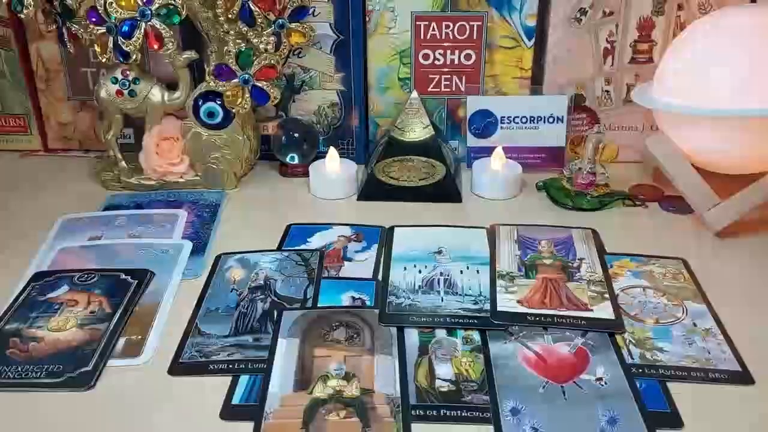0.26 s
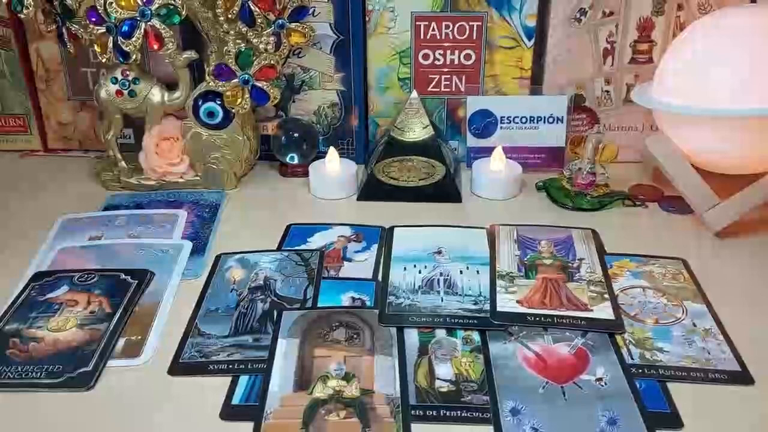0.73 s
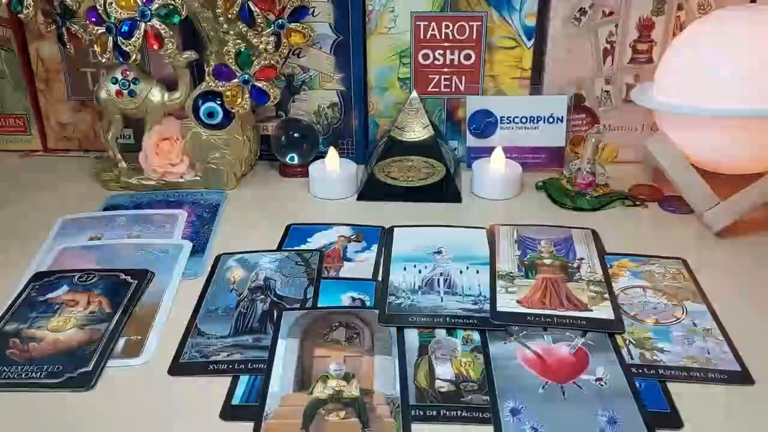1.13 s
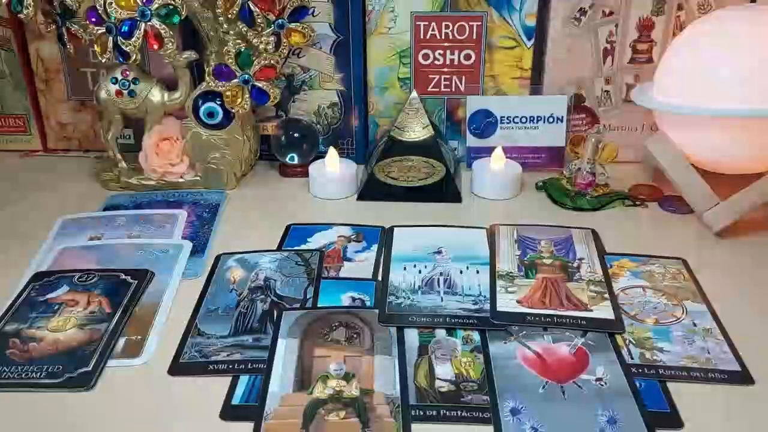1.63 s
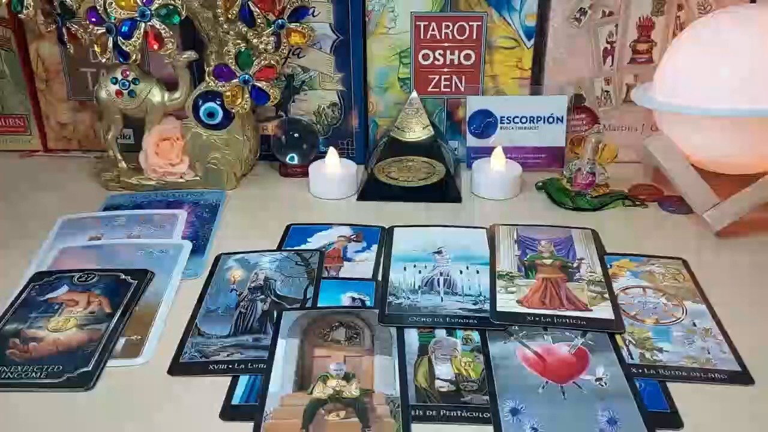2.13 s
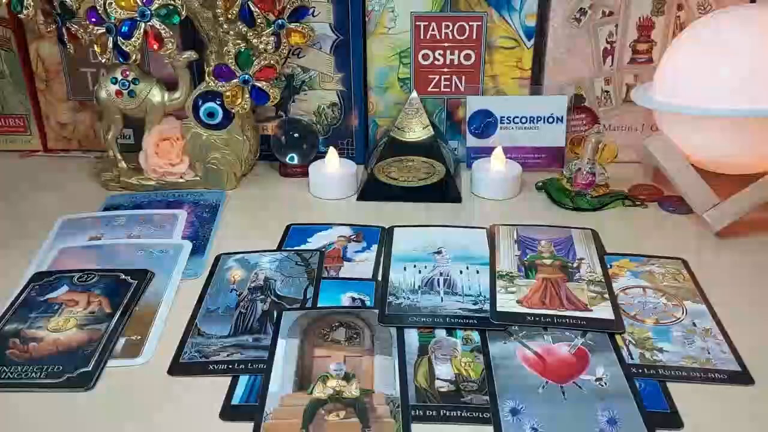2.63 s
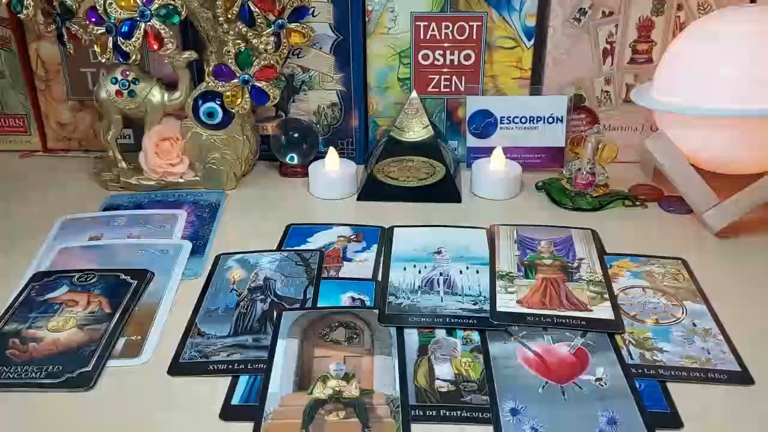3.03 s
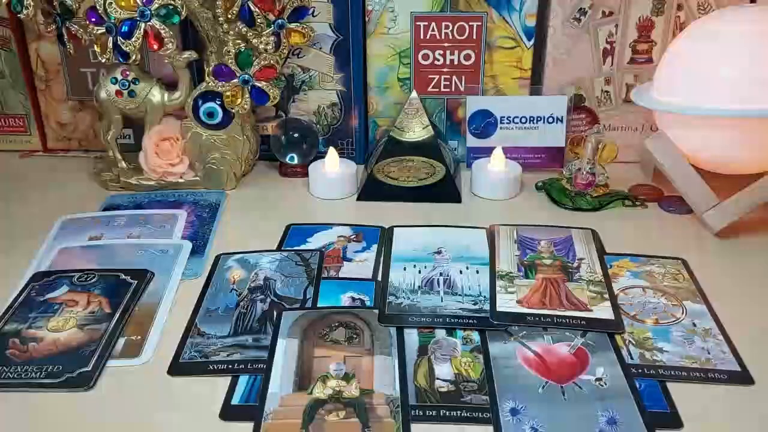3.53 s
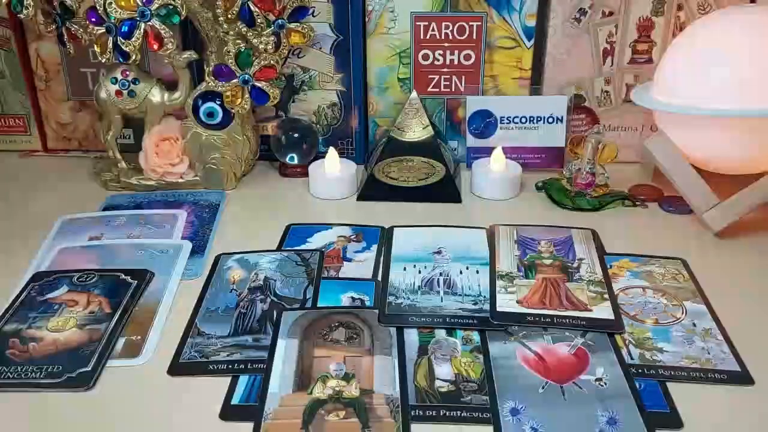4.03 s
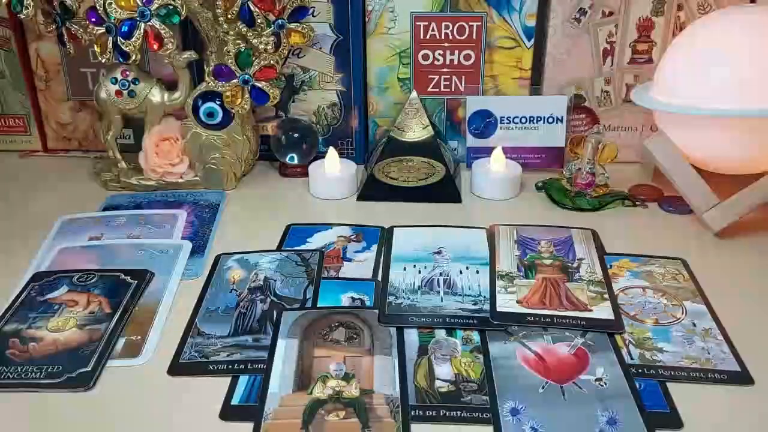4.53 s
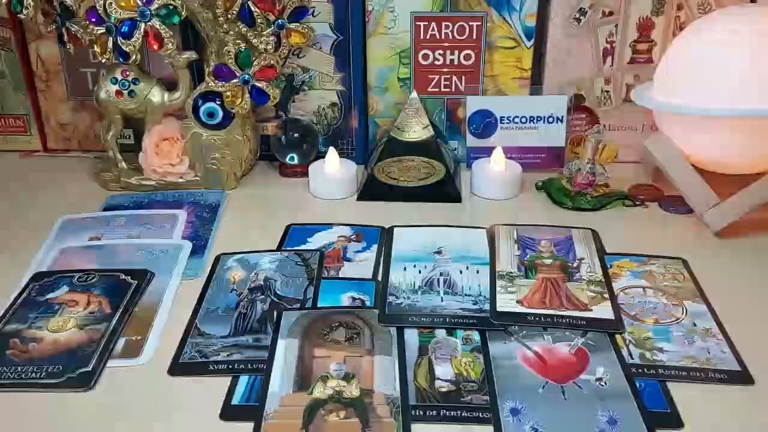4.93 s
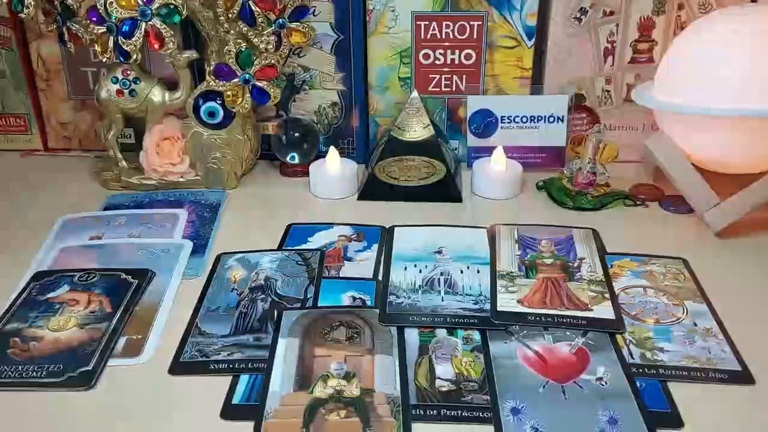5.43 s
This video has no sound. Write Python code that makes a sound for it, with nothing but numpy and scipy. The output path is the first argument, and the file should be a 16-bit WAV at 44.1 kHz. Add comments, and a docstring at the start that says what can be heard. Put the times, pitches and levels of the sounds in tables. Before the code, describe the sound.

Close card shuffling at a table, with dry flicks, papery rustles, dull knocks and soft low thumps over faint room hum.

```python
"""Card shuffling over a table

A deck of cards is handled close by in a small room: it knocks on the table, edges snap, faces slide, skin brushes.
Clicks with dying scuffs make knocks and snaps; grains and noise make slides; shaped noise makes brushes.
A stereo-widening effect smears the cards into a short wide splash, and a room tail follows.
Hand bumps ring the table modes; a stand sways, the table booms, a low hum wavers and a hiss lies beneath."""
import sys
import numpy as np
from scipy import signal
from scipy.fft import rfft, irfft
from scipy.io import wavfile
from scipy.ndimage import uniform_filter1d

SR = 44100
rng = np.random.default_rng(int(sys.argv[2]) if len(sys.argv) > 2 else 0)


def waveform_to_disk(signal):
    """Save audio, clipped to [-1, 1], as 16-bit WAV at the path in sys.argv[1]."""
    frames = np.transpose(np.atleast_2d(signal))
    scaled = np.clip(frames, -1, 1) * 32767
    samples = np.round(scaled).astype(np.int16)
    wavfile.write(sys.argv[1], SR, samples)


N = 250468
TIME = np.arange(N) / SR


def amp(db):
    """Decibels to gain."""
    return 10 ** (np.asarray(db) / 20)


def evened(x):
    """Scales to an rms of one."""
    return x / np.sqrt(np.mean(x ** 2) + 1e-20)


def read(points, hz):
    """Reads a table on a log-frequency axis."""
    f, value = np.transpose(points)
    return np.interp(np.log(hz + 1), np.log(f + 1), value)


def coloured(x, points):
    """Filters by a table of (frequency [Hz], gain [dB])."""
    size = x.shape[-1]
    gain = amp(read(points, np.fft.rfftfreq(size, 1 / SR)))
    return irfft(rfft(x) * gain, size)


def add(mix, s, sound):
    """Mixes a sound in, centred on time s."""
    start = round(s * SR) - len(sound) // 2
    part = mix[max(start, 0):start + len(sound)]
    part += sound[max(-start, 0):][:len(part)]


def peaks(modes, hz):
    """The dB curve of a set of (centre [Hz], width [Hz], lift [dB]) resonances."""
    return sum(db / (1 + (2 * (hz - f) / width) ** 2) for f, width, db in modes)


def ring(x, modes, size=8192):
    """Minimum-phase resonances, which ring on after the sound that drives them."""
    log_gain = np.log(amp(peaks(modes, abs(np.fft.fftfreq(size, 1 / SR)))))
    spectrum = np.exp(np.conj(signal.hilbert(log_gain)))
    response = np.fft.ifft(spectrum).real
    return signal.fftconvolve(x, response[:size // 2])[:len(x)]


def contact(scuff, drag_s, size=8192):
    """One click in the middle, followed by a scuff that dies exponentially."""
    t = (np.arange(size) - size // 2) / SR
    drag = rng.standard_normal(size) * np.exp(-abs(t) / max(drag_s, .001)) * (t > 0)
    return ((t == 0) + scuff * drag / np.linalg.norm(drag)) / np.hypot(1, scuff)


# deck on table: (time [s], relative level [dB], bass weight [dB], contact time [ms], hollow under the hand [Hz])
KNOCK_EVENTS = [(.713, -21.5, -3.5, 0.44, 1060), (.743, -17.5, -13, 0.37, 810),
                (.817, -23.5, -7.5, 1.1, 690), (.91, -31, -9, 0.64, 694), (.982, -15, -12.5, 1.23, 348),
                (1.009, -22, -24, 1.26, 322), (1.735, -36.5, 2.5, 1.1, 330), (1.762, -37.5, -6, 1, 338),
                (2.802, -13, -5, 0.29, 890), (3.022, -25.5, -6, 0.88, 480), (3.229, -17, -9, 0.35, 1350),
                (3.298, -13, -7.5, 0.15, 1830), (4.25, -24.5, -2.5, 0.31, 1210),
                (4.287, -32, 9.5, 0.13, 810), (4.327, -11, -29, 0.17, 2500), (5.223, -23.5, -15, 0.33, 297)]
# knock spectrum: (frequency [Hz], gain [dB])
KNOCK_SPECTRUM = [(60, 27), (180, 24), (320, 23.5), (550, 13.5), (800, 16.5), (1200, 15.5), (2000, 13),
                  (3200, 8), (5000, 8.5), (7000, 4), (10000, 3.5), (14500, -6)]
THUD_DB, SCUFF_DB = -9.5, -30  # thud relative to the bass weight; floor under the contact's treble loss
HOLLOW_Q, HOLLOW_DB_PER_MS = 4, 10.5  # a slower blow traps more air, so its hollow rings more
CRACK_DB, CRACK_CONTACT_MS = 12.5, 0.11  # treble lift at zero contact time; contact time that cuts it to 1/e


def knocks(lag_s=.011, overtone=2.33, overtone_share=0.56, steepness=1.89):
    """The deck lands: longer contact makes a duller blow; air under the hand adds two resonances."""
    out, bands_hz = np.zeros(N), np.geomspace(60, 15000, 25)
    for s, db, bass_db, contact_ms, hz in KNOCK_EVENTS:
        crack_db = CRACK_DB * np.exp(-contact_ms / CRACK_CONTACT_MS)
        weight = [(180, bass_db + THUD_DB), (350, bass_db), (700, 0.006), (1100, 0),
                  (1900, crack_db), (5500, crack_db), (10000, 0.0045)]
        corner_hz = 1000 / contact_ms
        lowpass_power = 1 / (1 + (bands_hz / corner_hz) ** (2 * steepness))
        softness_db = 10 * np.log10(lowpass_power + amp(SCUFF_DB) ** 2)
        hardness = np.transpose([bands_hz, read(weight, bands_hz) + softness_db])
        click = coloured(contact(scuff=1.0, drag_s=0.015), KNOCK_SPECTRUM)
        blow = coloured(click, hardness)
        lift_db, width_hz = HOLLOW_DB_PER_MS * contact_ms, hz / HOLLOW_Q
        hollow = [(hz, width_hz, lift_db), (hz * overtone, width_hz, lift_db * overtone_share)]
        add(out, s + lag_s, amp(db) * ring(blow, hollow))  # the lag offsets the lead of the smear
    return out


# edges off the pack: (time [s], relative level [dB], hollow body [dB], sharp edge [dB], drag decay [s])
SNAP_EVENTS = [(0.15, -16, -6.5, -2, 0.021), (0.258, -1.5, -19, -13.5, 0.012), (0.321, -12, -21, -19, .011),
               (0.439, -10.5, -12.5, -4, 0.018), (1.66, -20, -16.5, -12.5, 0.043),
               (2.027, -3.5, -16.5, -8, .008), (2.543, -16.5, -23, -4.5, .014),
               (2.562, -22, -8, 3.5, 0.0076), (2.676, -14.5, -24.5, -19.5, 0.009),
               (3.687, -13.5, -7, -9.5, 0.015), (4.323, 1, -25, -1.5, 0.027), (4.515, -10, -40, 8, 0.018),
               (4.538, -14.5, -35, 13.5, 0.012), (4.621, -13.5, -26, 12, .009), (4.69, -12, -36, -1, .017),
               (4.738, -11, -28, -13, 0.0081), (4.894, -18, -12.5, -7.5, 0.059),
               (5.305, -5.5, -40, -11, 0.0097), (5.367, -8, -31, -30, 0.0064),
               (5.507, 1, -44, -17.5, 0.0061)]
# snap spectrum: (frequency [Hz], gain [dB])
SNAP_SPECTRUM = [(60, 8), (130, 19.5), (300, 12.5), (520, 9), (800, 6.5), (1300, -1), (2200, 1),
                 (3400, 2.5), (5200, 6.5), (7000, -4.5), (9000, -4), (14500, -14)]


def snaps(lag_s=.010):
    """A bent card edge springs free and drags over the next card."""
    out = np.zeros(N)
    for s, db, body_db, edge_db, drag_s in SNAP_EVENTS:
        hardness = [(350, body_db), (1300, 0), (4000, edge_db)]
        click = coloured(contact(scuff=1.0, drag_s=drag_s), SNAP_SPECTRUM)
        add(out, s + lag_s, amp(db) * coloured(click, hardness))
    return out


def resonate(x, hz, width_hz):
    """A resonance of gain one that follows the curve hz."""
    turn = np.exp(2j * np.pi * np.cumsum(hz) / SR)
    r = np.exp(-np.pi * width_hz / SR)
    return 2 * (turn * signal.lfilter([1 - r], [1, -r], x / turn)).real


def shifting(x, patchy_db):
    """The touching parts of the cards keep changing, so patches of the spectrum come and go."""
    z = signal.stft(x, SR, nperseg=512)[2]
    patches = uniform_filter1d(rng.standard_normal(z.shape), size=6, axis=0)
    patches = evened(uniform_filter1d(patches, size=8, axis=1))
    return signal.istft(z * amp(patchy_db * patches), SR, nperseg=512)[1][:N]


# card strokes, one list each: (time [s], pressure as relative level [dB], brightness [dB])
SLIDE_STROKES = [
    [(0, -27.5, -7), (.014, -29.5, -2.5), (.245, -36, -7), (.27, -29, -2.5), (.356, -40.5, 2.5),
     (.375, -25, -7), (.408, -38.5, -2), (.45, -24, -3.5), (.49, -33.5, -2.5)],
    [(3.76, -51, -6), (3.814, -32.5, -3.5), (3.84, -55, 5)],
    [(4.37, -38, -18), (4.382, -18.5, -3.5), (4.436, -35, 9.5), (4.502, -24.5, 5.5), (4.546, -17.5, 2),
     (4.572, -27.5, 5.5), (4.65, -20.5, 3), (4.76, -24, 10.5), (4.86, -44.5, -9)],
    [(5.12, -41, -16), (5.186, -33.5, -2.5), (5.384, -30, -2), (5.412, -39.5, -2), (5.482, -35, -1.5),
     (5.524, -19.5, -0.5), (5.552, -30, -3.5), (5.616, -28.5, -3), (5.68, -36.5, -1)],
]
# rub spectrum: (frequency [Hz], gain [dB])
SLIDE_SPECTRUM = [(59, -44), (100, -1), (383, -8), (425, -2), (535, -13), (797, -2), (1430, -7.5),
                  (1560, -5), (2370, -11), (3460, -14), (5260, -11.5), (6620, -17.5), (8880, -17),
                  (14100, -25.5), (15000, -78)]
# resonances of the pack: (centre [Hz], width [Hz], lift [dB])
PACK_MODES = [(2500, 820, 9), (5530, 510, 8.5), (8510, 630, 12)]
# scrape pitch under a loose grip, its rise under a firm one, its rms random drift
SCRAPE_HZ, SCRAPE_RISE_HZ, SCRAPE_WANDER_HZ = 2060, 380, 198


def slides(catches_per_s=260, spread_db=5, smooth=0.25, split_hz=3700, firm_db=-25, scrape_db=0,
           touch_s=0.0058):
    """Faces catch and slip in tiny grains over a smooth swish; firm strokes make the pack resonate."""
    size = amp(spread_db * np.minimum(rng.exponential(1, N), 3))
    caught = rng.choice([-1, 1], N) * (rng.random(N) < catches_per_s / SR)
    grains = evened(size * caught)
    rub = coloured(grains + smooth * rng.standard_normal(N), SLIDE_SPECTRUM)
    rub = shifting(rub, patchy_db=3)
    dull = signal.sosfiltfilt(signal.butter(3, split_hz, fs=SR, output="sos"), rub)

    s, db, bright_db = np.concatenate(SLIDE_STROKES).T
    touching = sum(np.clip(np.minimum(TIME - rows[0][0], rows[-1][0] - TIME) / touch_s + 1, 0, 1)
                   for rows in SLIDE_STROKES)
    pressure = touching * amp(np.interp(TIME, s, db))
    firm = pressure ** 2 / (pressure ** 2 + amp(firm_db) ** 2)
    bright = amp(np.interp(TIME, s, bright_db)) * evened(rub - dull)

    drift = uniform_filter1d(rng.standard_normal(N), size=2000)
    drift = evened(uniform_filter1d(drift, size=2000))
    scrape_hz = SCRAPE_HZ + SCRAPE_RISE_HZ * firm + SCRAPE_WANDER_HZ * drift
    dull = evened(dull + amp(scrape_db) * resonate(dull, scrape_hz, width_hz=480))

    swish = pressure * (dull + bright)
    loose = coloured((1 - firm) * swish,
                     [(90, 1.0), (180, 4.5), (320, 8.5), (700, 7.5), (2000, 4), (12000, 3.5)])
    gripped = coloured(firm * swish, [(150, -16), (300, -3), (700, -3), (2000, 4.5), (12000, -4)])
    return loose + ring(gripped, PACK_MODES)


# fingertips on card: (time [s], length [s], relative level [dB])
BRUSH_EVENTS = [(0.66, 0.099, -50), (0.846, 0.059, -44), (1.02, .055, -50.5), (1.198, 0.026, -49.5),
                (1.313, 0.11, -51), (1.562, 0.042, -52), (1.824, 0.071, -47.5), (2.271, 0.085, -52.5),
                (2.486, .085, -46.5), (3.615, .054, -53), (5.013, 0.08, -51.5), (5.089, 0.036, -42.5)]
# brush spectrum: (frequency [Hz], gain [dB])
BRUSH_SPECTRUM = [(300, -8), (1000, 8), (2500, 0), (3600, -4), (5300, 3), (7000, -5.5), (9000, -2.5),
                  (13000, -12), (15000, -12)]


def brushes():
    """Skin passes lightly over card: a soft, even hiss that swells and fades."""
    level = sum(amp(db) * np.exp(-(2 * (TIME - s) / length) ** 2) for s, length, db in BRUSH_EVENTS)
    return level * evened(coloured(rng.standard_normal(N), BRUSH_SPECTRUM))


# heel of the hand on the table: (time [s], relative ring level of the top [dB], deep boom level [dB])
BUMP_EVENTS = [(0.122, -37, -30.5), (0.281, -46, -34), (0.439, -42, -31.5), (0.818, -55, -31),
               (1.755, -46, -32.5), (2.825, -35.5, -22.5), (3.305, -30, -24.5), (4.308, -41, -19),
               (4.739, -48, -25), (5.204, -38, -29.5), (5.516, -34, -37), (5.615, -42, -31)]
# modes of the table top: (frequency [Hz], relative level [dB], t60 [s])
TABLE_MODES = [(164, 6, 0.14), (196, 6, 0.24), (220.5, 1.5, 0.7), (268, -9, 0.075), (301, -6, 0.22)]


def bumps(contact_s=0.0056):
    """A soft push of the hand sets the table top ringing, each mode in its own phase at each ear."""
    out, t = np.zeros((2, N)), np.arange(SR // 3) / SR
    soft = np.sin(np.pi / 2 * np.clip(t / contact_s, 0, 1)) ** 2
    for s, level_db, _ in BUMP_EVENTS:
        modes = sum(amp(db - 60 * t / t60) * np.sin(2 * np.pi * (hz * t + rng.random((2, 1))))
                    for hz, db, t60 in TABLE_MODES)
        part = out[:, round(s * SR):][:, :len(t)]
        part += (amp(level_db) * soft * modes)[:, :part.shape[1]]
    return out


def stereo_smear(x, width_s, direct=0.17, even=0.75, shared=0.15, size=4096):
    """Direct sound amid a dense, short stereo smear, partly shared; the right ear lags."""
    t = (np.arange(size) - size // 2) / SR
    swell = np.exp(-abs(t / width_s) ** 3)
    scatter = rng.standard_normal((3, size))
    paths = np.sqrt(shared) * scatter[0] + np.sqrt(1 - shared) * scatter[1:]
    z = rfft(paths * swell)
    paths = irfft(z / abs(z) ** even) * np.sqrt(swell)  # no pitch is favoured much
    paths /= np.linalg.norm(paths, axis=1, keepdims=True)
    paths[:, size // 2 - int(width_s * SR / 2)] += direct
    paths[1] = np.roll(paths[1], round(.00036 * SR))  # ear lag, s
    return np.array([signal.oaconvolve(x, path, "same") for path in paths])


# room decay: (frequency [Hz], t60 [s])
ROOM_T60 = [(150, 0.29), (400, 0.46), (1040, 0.43), (2760, 0.43), (7280, 0.27), (14000, 0.2)]


def room(x, gap_s=0.0068):
    """The room's tail at each ear: random reflections, each band dying at its own speed."""
    hz, t, z = signal.stft(rng.standard_normal((2, SR)), SR, nperseg=256)
    decay = amp(-60 * t / read(ROOM_T60, hz)[:, None])
    tail = signal.istft(z * decay, SR, nperseg=256)[1]
    tail *= np.clip(np.arange(tail.shape[1]) / SR / gap_s - 1, 0, 1)  # silent for one gap, full after two
    return signal.fftconvolve(x[None], tail / np.linalg.norm(tail[0]), axes=1)[:, :N]


# narrow peaks of the comb colour: (centre [Hz], width [Hz], lift [dB])
COMB_PEAKS = [(215, 30, 3), (305, 35, 4), (810, 40, 4), (1604, 35, 4), (1753, 35, 4), (2244, 45, 3),
              (2438, 45, 5), (2767, 45, 4), (3887, 45, 4), (5112, 50, 3), (5392, 50, 3), (6112, 50, 3)]
# dips of the comb colour: (centre [Hz], width [Hz], lift [dB])
COMB_DIPS = [(385, 30, -4), (535, 80, -3), (1450, 80, -3), (3000, 60, -3)]


def comb_colour(ears):
    """The stereo smear's fixed comb lifts narrow bands and dips others."""
    return np.array([ring(ear, COMB_PEAKS + COMB_DIPS) for ear in ears])


def drone(hz, width_hz, same, steady):
    """A low resonance shaken at random, partly shared by both ears; steady flattens its envelope."""
    detune = 2 * (np.fft.rfftfreq(N, 1 / SR) - hz) / width_hz
    band = irfft(rfft(rng.standard_normal((3, N))) / (1 + detune ** 2), N)
    wave = signal.hilbert(np.sqrt(same) * band[0] + np.sqrt(1 - same) * band[1:])
    levelled = wave.real / abs(wave) ** steady
    return evened(coloured(levelled, [(84, -14), (100, -26), (150, -49)]))


# low hum: (time [s], level [dB])
HUM_LEVEL = [(0, -36), (0.9, -36), (1.95, -43), (2.1, -44.5), (2.75, -46.5), (2.86, -37.5), (3.55, -32.5),
             (4.17, -46), (4.4, -40), (5.68, -36)]
SWAY_HZ, BOOM_HZ, HUM_HZ = 20.3, 48.7, 80.2
SWAY_DB, SWAY_FALL_DB_PER_S = -28, 2.84
BOOM_RISE_S, BOOM_FALL_DB_PER_S, BOOM_REST_DB = 0.041, 45, -44  # rises into each bump, falls to a tremble


def lows():
    """A stand sways and slowly settles, the table booms at each bump, and a low hum wavers."""
    sway = amp(SWAY_DB - SWAY_FALL_DB_PER_S * TIME)
    booms = [amp(db - BOOM_FALL_DB_PER_S * np.maximum(TIME - s, 0))
             * np.clip((TIME - s) / BOOM_RISE_S + 1, 0, 1) for s, _, db in BUMP_EVENTS]
    boom = np.hypot(np.linalg.norm(booms, axis=0), amp(BOOM_REST_DB))
    hum = amp(np.interp(TIME, *np.transpose(HUM_LEVEL)))
    return (sway * drone(SWAY_HZ, 9.7, same=0.7, steady=0.86)
            + boom * drone(BOOM_HZ, 31.0, same=0.031, steady=0.36)
            + hum * drone(HUM_HZ, 8, same=0.054, steady=0.4))


# hiss spectrum: (frequency [Hz], gain [dB])
HISS_SPECTRUM = [(65, -47), (110, -26), (135, -11.5), (200, -4.5), (320, -9.5), (420, -13.5), (514, -29),
                 (606, -18), (12000, -33.5), (14100, -32.5), (15000, -83)]


def hiss(rms_db=-54.5):
    """Steady coloured noise, independent at each ear."""
    return amp(rms_db) * evened(coloured(rng.standard_normal((2, N)), HISS_SPECTRUM))


def scene(knock_db=20, snap_db=20, slide_db=-3, brush_db=0, bump_db=-4,
          knock_room_db=-6, snap_room_db=-14, slide_room_db=-14):
    """Knocks on the table fill the room; the cards in the hands sound closer and drier."""
    blows = amp(knock_db) * knocks()
    flicks = amp(snap_db) * snaps()
    rub = amp(slide_db) * slides()
    soft = rub + amp(brush_db) * brushes()
    near = (stereo_smear(blows, width_s=0.019) + stereo_smear(flicks, width_s=.021)
            + stereo_smear(soft, width_s=.016))
    tail = room(amp(knock_room_db) * blows + amp(snap_room_db) * flicks + amp(slide_room_db) * rub)
    cards = comb_colour(near + tail)
    return cards + amp(bump_db) * bumps() + hiss() + lows()


def record(dry, edge_hz=14700):
    """Full-scale limit, then the band limit."""
    lowpass = signal.firwin(255, edge_hz, window=("kaiser", 9), fs=SR)
    return signal.oaconvolve(np.clip(dry, -1, 1), lowpass[None], "same")


dry = scene()
out = record(dry)
waveform_to_disk(out)
```